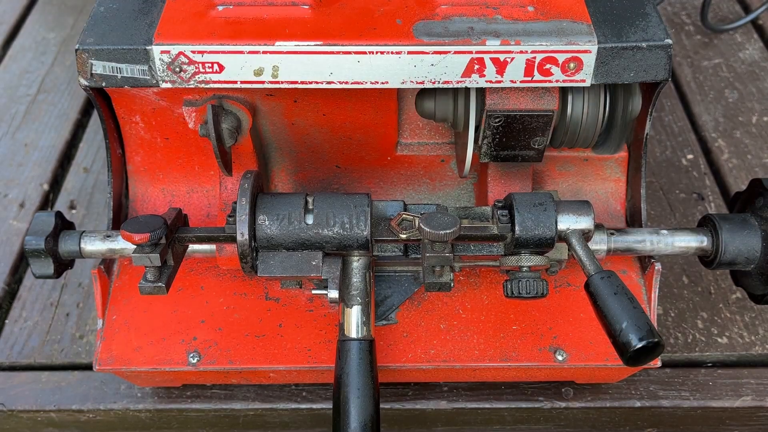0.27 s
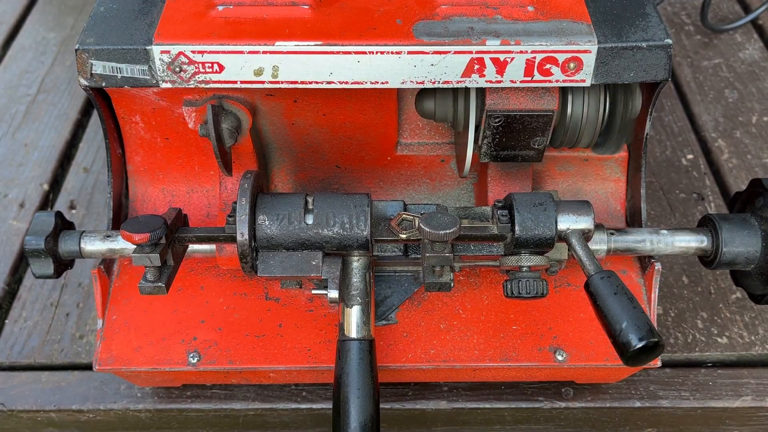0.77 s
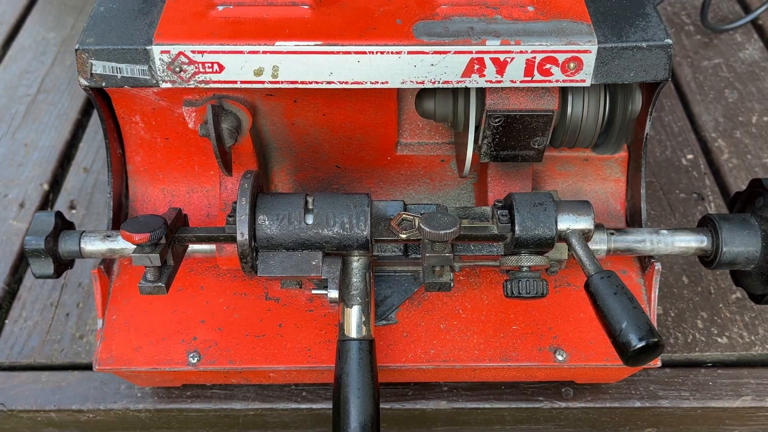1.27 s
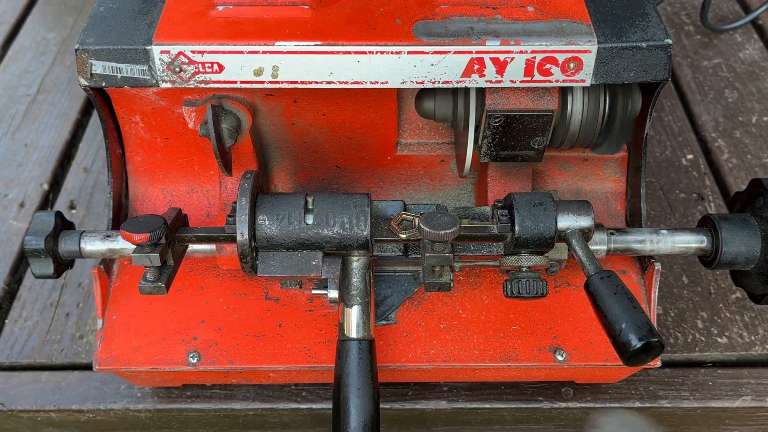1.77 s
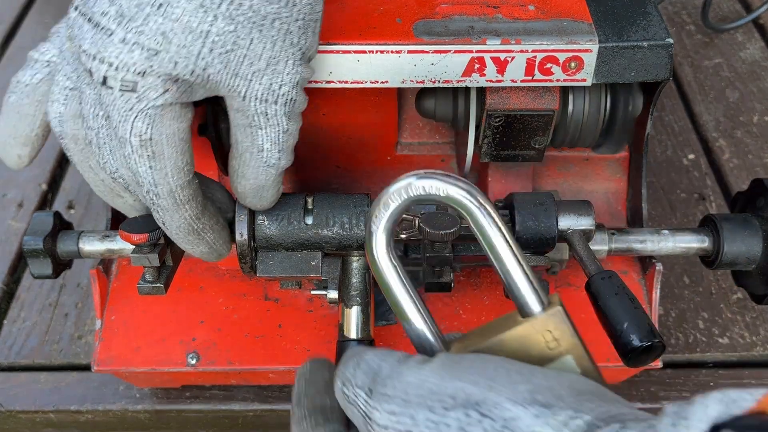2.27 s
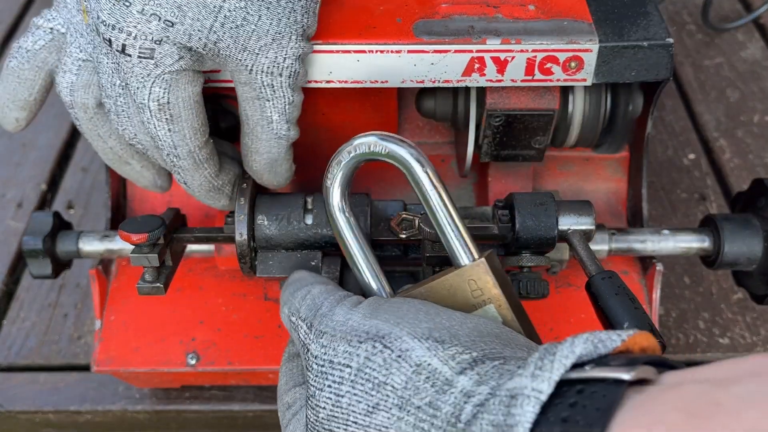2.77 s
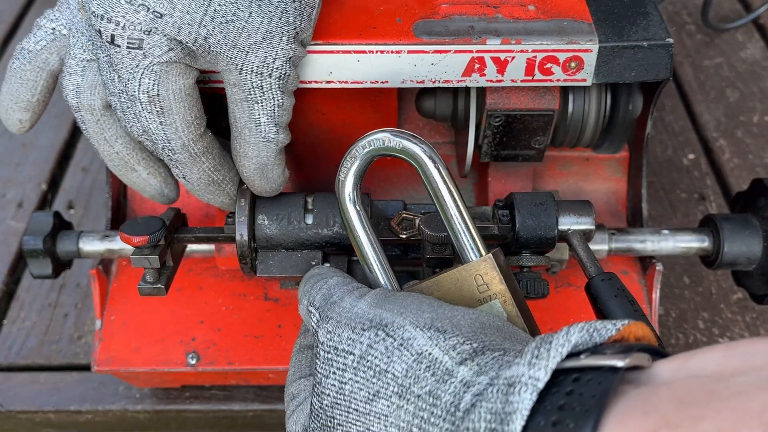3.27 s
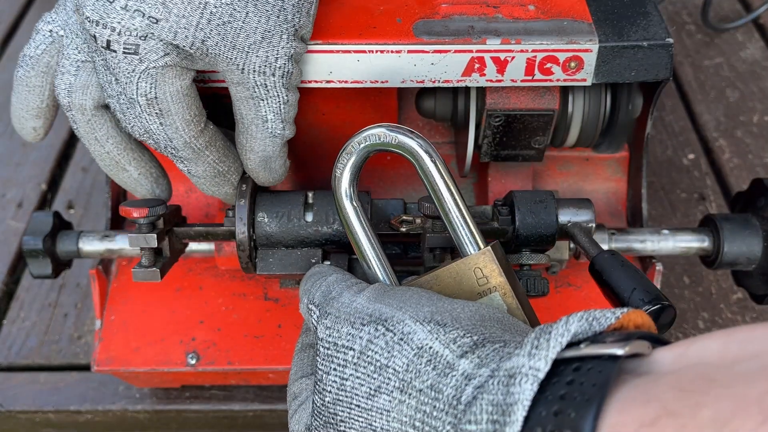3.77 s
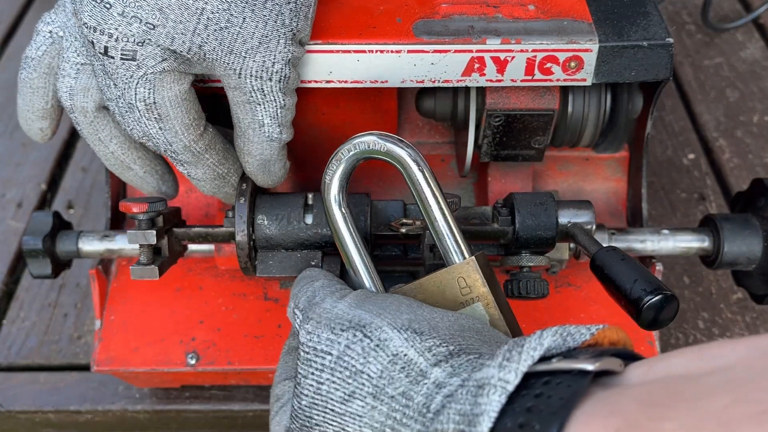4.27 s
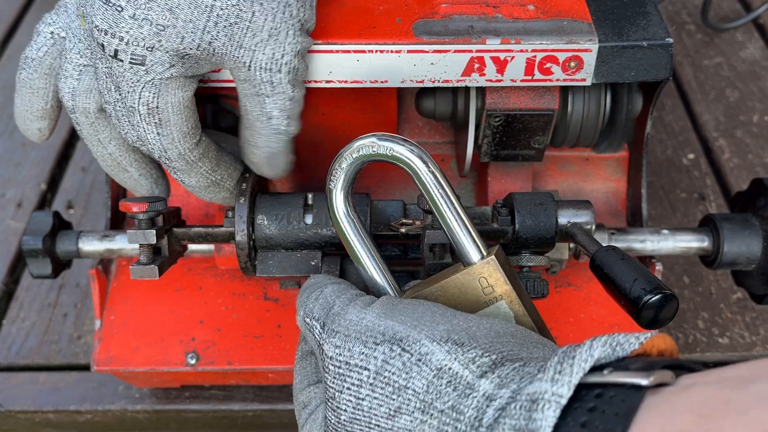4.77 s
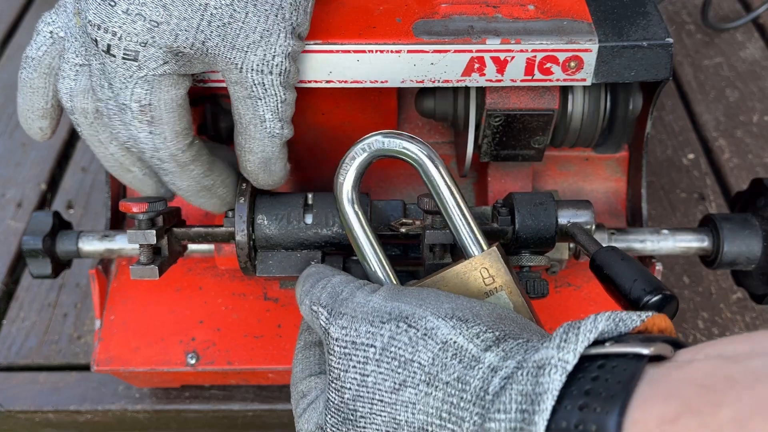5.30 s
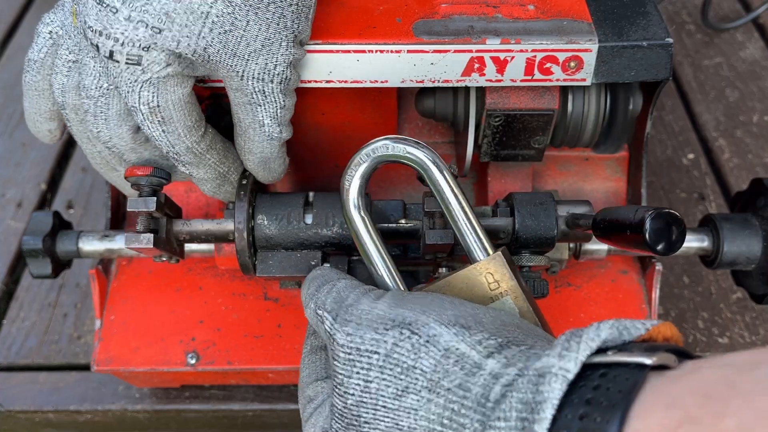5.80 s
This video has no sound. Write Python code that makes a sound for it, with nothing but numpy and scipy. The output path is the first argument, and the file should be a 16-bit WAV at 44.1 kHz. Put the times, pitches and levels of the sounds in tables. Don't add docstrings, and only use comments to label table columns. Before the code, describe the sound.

Steady low motor hum with faint whine and rattling sheet metal, a brief spill of tiny metal parts, sparse ticks, then mostly plain running.

```python
import sys
import numpy as np
from scipy import signal
from scipy.fft import rfft, irfft
from scipy.io import wavfile
from scipy.ndimage import uniform_filter1d

SR = 44100
rng = np.random.default_rng(int(sys.argv[2]) if len(sys.argv) > 2 else 0)


def invert_db(level):
    return 10 ** (np.asarray(level, dtype=float) / 20)


def dump(signal):
    limited = np.clip(np.atleast_2d(signal).T, -1, 1)
    pcm = np.round(limited * 32767).astype(np.int16)
    wavfile.write(sys.argv[1], SR, pcm)


N = 266364
T = np.arange(N) / SR
HZ = np.maximum(np.arange(N // 2 + 1) * SR / N, 1)

HUM_HZ, SHAFT_HZ, BELT_HZ, WHEEL_HZ = 99.78, 24.7895, 5.112, 12.1
HUM_DB, WHINE_DB, SWING_DB, RATTLE_DB, WHIRR_DB, HISS_DB = -30.5, -46.5, -38, -39.5, -52.5, -68.5
SLOT_TOUCH_DB, RUMBLE_DB = -80, -50
WHINE_BACK_DB, SLOT_TOUCH_COVER_DB, SWING_COVER_DB = 4.5, 15, -3.5
RATTLE_COVER_DB, WHIRR_COVER_DB, HISS_COVER_DB = -0.67, -2.5, -6
BELT_SWING_DB, BELT_TIGHT_SHARE = 1, 0.35
BUMP_S, BUMP_DB, BUMP_HZ = 1.63, -48, 32
LUMP_WIDTH = 0.087
JOINT_FIRST_S, JOINT_SCRAPE_DB, JOINT_SCRAPE_SLOPE, JOINT_THUMP_DB = 0.1477, -48, 0.8, -22
PING_CYCLES, PING_BRIGHT_HZ, PING_GRIT = 66, 22000, 1.1
CLICK_BRIGHT_HZ, CLICK_GRIT = 9500, .9
CLATTER_S, CLATTER_LENGTH_S, CLATTER_HZ, CLATTER_T60_S = 1.515, .2, 1850, .011
CLATTER_DB, CLATTER_FADE_DB = -39, -6
SURGE_GRIT, PANEL_LAG_MS, SURGE_LAG_MS = 0.37, 1.75, .7

# time in seconds, cover 0-1, whine thrown back 0-1,
# lean on the bench in dB.
HANDS = [(0.0, 0.1, 0, 1.5), (.33, 0.2, 0.3, 0.5), (.55, 0.45, 0.54, 0.4), (1.3, 0.2, 0, -0.5),
         (2.0, 0.58, 0.2, -.6), (2.95, 0.62, 0.03, -0.2), (3.15, 1, 1, 0.5), (3.8, .95, 0.4, -2),
         (3.95, 0.94, .8, -1), (4.65, 0.92, 0.05, -0.5), (5.0, 0.9, 0.3, -1.5), (5.35, 1, 0.83, 0),
         (6.04, 0.93, 0.2, 0)]
# frequency in Hz, likeness 0-1, left lead in radians, left minus right in dB.
PORTS = [(25, .93, -.2, 0), (100, .9, -.7, .3), (210, .92, -1.05, -2), (320, .98, -.2, 1),
         (400, .99, -.6, -.3), (550, .92, -.1, -3.4), (720, .85, 0, -9.5), (950, .9, 1.8, -4.3),
         (1190, .8, 1.2, 0), (1500, .55, .5, -3), (2050, .9, -.1, .5), (2900, .6, 1.1, 1.8),
         (4300, .6, .3, 0), (5000, .8, -.2, 0), (5600, .5, -1.9, -.5), (6300, .85, -2.8, 0),
         (6900, .92, -3.5, 0), (7500, .8, -4.7, -1.5), (8400, .96, -5.9, -.3), (9900, .96, -6.7, 0),
         (10600, .85, -7.5, 0), (11800, .95, -9, .3), (13600, .95, -9.8, .3), (14200, .8, -10.8, .3),
         (15500, .9, -12.3, .3)]
# frequency in Hz, density in dB per Hz.
RUMBLE = [(12, -86), (20, -45.5), (43, -16.5), (86, -7.5), (121, -10), (150, -6), (190, -45), (250, -52),
          (420, -120)]
# frequency in Hz, density in dB per Hz.
HISS = [(2500, -39), (4000, -4), (5000, -11), (6000, -6.5), (6700, -3.5), (7500, -9.5), (8600, -10.5),
        (10000, -14.5), (11500, -11.5), (12800, -15), (14200, -16), (15700, -24), (15900, -78)]
# frequency in Hz, width in Hz, level in dB.
BEARING_MODES = [(1270, 530, 4.5), (1500, 24, 6), (1800, 190, -6.5), (1963, 310, -2.5), (2057, 45, 5.5),
                 (2200, 510, -6), (2500, 300, -9.5), (2886, 490, -5.5), (3370, 710, -13), (3563, 51, -1),
                 (3810, 260, -6.5)]
# time in seconds, body in dB, bright part in dB.
RUBS = [(.165, -67, -66), (.925, -41, -78), (1.165, -47, -80), (1.275, -52, -60), (1.33, -54, -72),
        (1.512, -38, -60), (1.532, -38, -52.5), (1.59, -63, -66), (1.64, -43, -76), (1.672, -43, -69),
        (1.75, -40, -72), (1.91, -38, -69), (2.102, -43, -75), (2.31, -44, -71), (2.42, -60, -71),
        (2.508, -46, -63), (2.6, -44, -76), (2.725, -44, -81), (2.91, -53, -69), (3.3, -47, -62),
        (3.497, -39, -56.5), (3.889, -57, -74), (4.078, -48, -71), (4.48, -53, -71), (4.672, -68, -69),
        (5.069, -48, -67), (5.258, -59, -69), (5.642, -45, -64)]
# start in seconds, peak in dB, ring in Hz.
PINGS = [(1.5356, -30, 5230), (1.538, -43.5, 1500), (1.541, -30.5, 1800), (1.542, -32.5, 2500),
         (1.552, -35.5, 1950), (1.5746, -29.5, 2280), (1.577, -43, 1800), (1.584, -40, 1404),
         (1.642, -42.5, 1500), (1.652, -35.5, 1880), (1.66, -63, 2780), (1.678, -50, 2200),
         (1.685, -49, 2000), (1.695, -49, 1680), (1.615, -53, 1940), (2.042, -40, 1500),
         (2.187, -39.5, 1820), (2.319, -48, 1920), (3.068, -45, 3370), (3.093, -43, 2570),
         (5.843, -42, 2010)]
# start in seconds, peak in dB, ring in Hz, 60 dB decay time in seconds.
CLICKS = [(0.1545, -34, 3220, 0.0055), (0.154, -50, 4300, 0.005), (0.153, -42, 8900, 0.012),
          (.165, -36, 2850, 0.0041), (.3404, -34.5, 5200, 0.011), (0.3412, -30.5, 1800, 0.0068),
          (0.341, -45, 7900, 0.008), (1.515, -41, 2140, .02), (1.579, -47, 3940, .01),
          (1.6318, -37, 5000, 0.014), (1.6321, -30, 8660, 0.018), (1.945, -30, 2400, 0.0085),
          (2.116, -41, 2760, 0.0051), (2.187, -47, 3000, 0.0051), (1.543, -49, 3200, 0.0059),
          (2.143, -40.5, 7400, 0.023), (2.149, -51, 7950, .03), (2.336, -45, 7100, 0.03),
          (2.435, -52, 4930, .02), (3.299, -42, 2500, 0.013), (3.3013, -51, 7700, 0.02)]
# frequency in Hz, width in Hz, level in dB.
CASE_MODES = [(208.2, 33, -2), (330, 19, -15.5), (361, 62, -9), (415, 34, -5), (460, 30, -8.5),
              (494.7, 45, -7.5), (562.6, 22, -14), (625, 39, -13), (699, 48, -14.5), (735, 72, -16),
              (884, 117, -16.5), (1006, 220, -21)]
JOINT_DB = [-11, 1, -6, -4.5, -0.5, -5, 1.5, -20, 1, -0.5, -2.5, -1, 1.5, -2.5, 0, -14, -22, -3, -33, -7.5,
            -33, -31, -11, -7, -4, -42, -27, -22, -17, -5]
# peak time in seconds, peak in dB, ring in Hz.
BIG_SURGES = [(0.124, -27, 207), (0.175, -35, 205), (0.209, -31.5, 201), (0.352, -22.5, 212),
              (0.407, -31.5, 214), (0.495, -28.5, 208), (0.607, -29.5, 202), (0.754, -30, 198),
              (0.797, -29, 194), (0.887, -23, 195), (0.939, -21, 210), (1.189, -41.5, 197),
              (1.287, -34, 203), (1.34, -27.5, 212), (1.528, -33, 212), (1.576, -30, 201),
              (1.774, -22.5, 210), (1.818, -28, 202), (1.921, -23, 215), (2.056, -28, 207),
              (2.127, -22, 208), (2.264, -31.5, 214), (2.319, -17.5, 200), (2.509, -19.5, 215),
              (2.598, -28, 206), (2.637, -32, 207), (2.738, -31, 199), (2.906, -21, 210),
              (3.098, -27.5, 213), (3.323, -33, 208), (3.401, -24, 203), (3.488, -28, 215),
              (3.581, -29, 211), (3.784, -23, 207), (3.905, -34, 211), (4.094, -31.5, 200),
              (4.197, -28.5, 201), (4.68, -31.5, 227), (4.778, -30.5, 203), (4.889, -32.5, 201),
              (4.994, -33, 213), (5.08, -28.5, 193), (5.174, -27.5, 190), (5.366, -34, 203),
              (5.476, -35.5, 204), (5.575, -30, 201), (5.657, -35, 205), (5.849, -29, 205)]
# peak time in seconds, peak in dB, ring in Hz.
SIDE_SURGES = [(0.287, -39, 395), (0.362, -29.5, 428), (0.468, -36, 398), (0.594, -30.5, 480),
               (0.656, -39.5, 375), (0.694, -27.5, 378), (0.74, -37, 398), (0.771, -32, 455),
               (0.876, -34, 474), (0.948, -29.5, 421), (1.06, -29, 391), (1.277, -31, 373),
               (1.315, -34, 402), (1.349, -28, 416), (1.378, -37.5, 346), (1.451, -32, 385),
               (1.52, -22, 395), (1.628, -33, 400), (1.848, -32, 366), (1.934, -31, 460), (2.09, -35, 415),
               (2.136, -39, 417), (2.321, -28.5, 397), (2.434, -35.5, 387), (2.519, -29.5, 426),
               (2.681, -38, 393), (2.72, -34, 418), (2.792, -33.5, 390), (2.843, -30.5, 368),
               (2.894, -35, 430), (3.002, -39.5, 416), (3.105, -47, 431), (3.181, -28, 415),
               (3.226, -27.5, 383), (3.774, -31, 428), (3.808, -38.5, 395), (3.894, -28, 436),
               (3.995, -33, 374), (4.089, -34, 492), (4.164, -38.5, 387), (4.29, -29, 395),
               (4.324, -33, 383), (4.365, -40, 390), (4.485, -32, 477), (4.585, -30.5, 475),
               (4.684, -40.5, 382), (4.912, -35, 384), (4.947, -37.5, 383), (5.274, -34.5, 368),
               (5.337, -32.5, 500), (5.369, -30.5, 395), (5.417, -31, 384), (5.538, -32.5, 382),
               (5.661, -30, 395), (5.739, -37, 390), (5.948, -33, 390)]
# peak time in seconds, peak in dB, ring in Hz.
COVER_SURGES = [(0.075, -46, 665), (0.115, -41, 667), (0.212, -34.5, 705), (0.487, -34.5, 690),
                (0.685, -40, 640), (0.766, -40, 670), (0.936, -34, 740), (0.97, -35, 862),
                (1.133, -37.5, 735), (1.172, -33, 735), (1.237, -38, 651), (1.329, -29.5, 722),
                (1.535, -30, 860), (1.57, -36, 730), (1.647, -38, 670), (1.762, -33, 732),
                (1.922, -32, 672), (2.13, -32.5, 643), (2.254, -31.5, 666), (2.327, -33, 634),
                (2.422, -32.5, 640), (2.462, -36, 660), (2.515, -28.5, 660), (2.618, -41, 710),
                (2.695, -36.5, 665), (2.745, -32, 736), (2.779, -37.5, 654), (2.813, -33, 674),
                (2.915, -41, 742), (2.945, -42, 730), (2.98, -36.5, 697), (3.093, -37.5, 720),
                (3.21, -37, 696), (3.327, -36, 680), (3.401, -32, 707), (3.511, -36.5, 713),
                (3.606, -41, 637), (3.664, -39, 657), (3.92, -32, 690), (4.001, -35, 700),
                (4.175, -34.5, 670), (4.38, -31, 670), (4.482, -37, 605), (4.556, -35, 660),
                (4.673, -32, 623), (4.754, -39, 649), (4.84, -35, 659), (4.878, -32.5, 637),
                (4.965, -38, 643), (5.037, -34, 660), (5.069, -45, 650), (5.166, -30, 640),
                (5.392, -40, 660), (5.475, -50, 664), (5.658, -32, 598), (5.708, -34.5, 675),
                (5.768, -34, 674), (5.8, -37, 656), (5.851, -29, 730), (5.967, -37, 660)]
SURGE_RISE_CYCLES = (4.3, 4.9, 5.3)
SURGE_FALL_CYCLES = (5.6, 7.9, 9.3)
# frequency in Hz, width in Hz, level in dB.
KNOCKED_MODES = [(312, 25, -9), (399.3, 10.6, -7)]
# share of the turn 0-1, swing 0-1, lag in ms.
LUMPS = [
    (0.079, 0.87, 0.92),
    (.3, 1, -.5),
    (.54, 0.7, 0.88),
    (.8, 0.72, 3),
    (0.936, 0.84, 1.5),
]
# shaft order, hum order (their multiples add up), level in dB.
TONES = [(0, 3, -54), (22, -1, -56), (22, 0, -63), (22, 1, -49), (23, 1, -54), (22, 2, -57), (22, 4, -64),
         (44, -1, -67), (44, 0, -65), (45, 0, -73), (49, 0, -60), (44, 2, -64), (45, 2, -71), (44, 3, -68),
         (42, 1, -63), (43, 10, -71), (110, 0, -84), (110, 1, -76), (110, 2, -76), (110, 3, -82)]


def unit(x):
    return x / np.sqrt(np.mean(x ** 2))


def on_hz(table, column):
    rows = np.array(table)
    return np.interp(np.log(HZ), np.log(rows[:, 0]), rows[:, column])


def resonance(hz, width, db):
    return invert_db(db) / (1 + 1j * (HZ / hz - hz / HZ) * hz / width)


def resonances(table):
    return np.sqrt(sum(abs(resonance(*mode)) ** 4 / invert_db(mode[2]) ** 2 for mode in table))


def walk(rate):
    hold = int(SR / rate)
    levels = np.repeat(rng.standard_normal(N // hold + 1), hold)
    return unit(uniform_filter1d(uniform_filter1d(levels, hold), hold)[:N])


def ports(x, slant=1):
    half = (invert_db(on_hz(PORTS, 3) / 2) * np.exp(.5j * on_hz(PORTS, 2))) ** slant
    x = x * np.minimum(np.minimum(T, T[::-1]) / .0006, 1)
    return irfft(rfft(x) * np.array([half, 1 / half]), N)


def spread_noise(envelope, response):
    alike = np.clip(on_hz(PORTS, 1), 0, 1)
    shared, left, right = (rfft(envelope * rng.standard_normal(N)) for _ in range(3))
    pair = np.sqrt(alike) * shared + np.sqrt(1 - alike) * np.array([left, right])
    return ports(irfft(pair * response / np.sqrt(np.mean(abs(response) ** 2)), N))


def belt_db():
    return BELT_SWING_DB * np.cos(4 * np.pi * (T * BELT_HZ - BELT_TIGHT_SHARE))


def joint_passes(level_db, slope):
    return [(JOINT_FIRST_S + k / BELT_HZ, level_db + slope * db) for k, db in enumerate(JOINT_DB)]


def swells(events, length_s):
    out, shape = np.zeros(N), np.hanning(int(length_s * SR))
    for s, db in events:
        start = int((s - .012) * SR)
        out[start:start + len(shape)] += invert_db(db) * shape
    return out


def bench():
    bump = invert_db(BUMP_DB) * np.exp(-((T - BUMP_S) / 0.12) ** 2) * np.sin(2 * np.pi * BUMP_HZ * T)
    rumble = spread_noise(invert_db(RUMBLE_DB + 0.51 * walk(4.77)), invert_db(on_hz(RUMBLE, 1)))
    return rumble + bump


def bearings(whirr_db, hiss_db):
    whirr = invert_db(whirr_db + 0.5 + 0.5 * belt_db() + 0.58 * walk(16))
    whirr = whirr + invert_db(-14.5) * swells(joint_passes(JOINT_SCRAPE_DB, JOINT_SCRAPE_SLOPE), 0.082)
    whirr = whirr + invert_db(-12.0) * swells([(s, body_db) for s, body_db, _ in RUBS], 0.052)
    hiss = invert_db(hiss_db + 4.5 + 0.062 * belt_db() + .7 * walk(20))
    hiss = hiss + invert_db(-0.5) * swells([(s, bright_db) for s, _, bright_db in RUBS], 0.047)
    frame = resonances(BEARING_MODES) / (1 + (900 / HZ) ** 4) / (1 + (HZ / 4300) ** 4)
    return spread_noise(whirr, frame) + spread_noise(hiss, invert_db(on_hz(HISS, 1)))


def clatter(count=90):
    late, size, pitch = rng.random((count, 3)).T
    start = CLATTER_S + CLATTER_LENGTH_S * late ** 1.1
    level = CLATTER_DB + CLATTER_FADE_DB * late - 8 * size
    ring_hz = CLATTER_HZ * 2 ** (1.2 * (pitch - .5))
    return [(s, db, hz, CLATTER_T60_S, .1, PING_GRIT) for s, db, hz in zip(start, level, ring_hz)]


def ticks():
    out, t = np.zeros(N), T[:4096]
    hz_axis = np.maximum(np.arange(2049) * SR / 4096, 1)
    # s, dB, Hz, t60 s, bright share, grit
    touches = [(s, db, hz, PING_CYCLES / hz, hz / PING_BRIGHT_HZ, PING_GRIT) for s, db, hz in PINGS]
    touches += [(s, db, hz, t60, (hz / CLICK_BRIGHT_HZ) ** 2, CLICK_GRIT) for s, db, hz, t60 in CLICKS]
    for s, db, hz, t60, bright, grit in touches + clatter():
        fall = np.exp(-np.log(1000) * t / t60)
        spray = rfft(fall * rng.standard_normal(len(t)))
        bright = np.clip(bright, 0, 1)
        ping = fall * np.sin(2 * np.pi * hz * t) * np.minimum(t / 0.0007, 1)
        snap = np.exp(-t / 0.0003) * np.sin(2 * np.pi * max(hz, 3000) * t)
        rattle = irfft(spray / (1 + 3j * (hz_axis / hz - hz / hz_axis)) ** 2)
        ring = ping + .8 * min(hz / 2500, 1) ** 3 * snap + grit * rattle
        crack = irfft(spray * 1.72 / (1 - 1j * 4000 / hz_axis) ** 2)
        start = int(s * SR)
        out[start:start + len(t)] += invert_db(db) * ((1 - bright) * ring + bright * crack)
    out = irfft(rfft(out) / (1 + 1j * (HZ / 8800) ** 2) / (1 + (HZ / 15700) ** 40), N)
    return ports(out) + .45 * ports(np.roll(out, 30), slant=0)


def case(rattle_db):
    pulse = 1 + 0.12 * np.sin(2 * np.pi * HUM_HZ * T)
    steady = invert_db(rattle_db + 2.06 + 1.23 * belt_db() + 0.94 * walk(14)) * pulse
    thump_envelope = invert_db(-15) * swells(joint_passes(JOINT_THUMP_DB, 1), .085)
    thump = spread_noise(thump_envelope, resonances(CASE_MODES[6:]))
    return spread_noise(steady, resonances(CASE_MODES)) + thump


def surges():
    out, t = np.zeros(N + 8192), T[:8192] - T[3072]
    tables = (BIG_SURGES, SIDE_SURGES, COVER_SURGES)
    for table, rise, fall, trim_db in zip(tables, SURGE_RISE_CYCLES, SURGE_FALL_CYCLES, (-5.0, -3.0, -2.5)):
        for (s, db, hz), turn in zip(table, rng.random(len(table))):
            if table is BIG_SURGES:
                turn = 2 * HUM_HZ * (s - PANEL_LAG_MS / 1000 - SURGE_LAG_MS / 1000)
            shape = np.exp(-(t * hz / np.where(t < 0, rise, fall)) ** 2)
            start = int(s * SR)
            out[start:start + len(t)] += invert_db(db + trim_db) * shape * np.sin(2 * np.pi * (hz * t + turn))
    return ports(out[3072:N + 3072] * (1 + SURGE_GRIT * walk(110)))


def panels(knock_db):
    at = (np.arange(int(T[-1] * HUM_HZ)) * SR / HUM_HZ).astype(int)
    strain = invert_db(1.3 * belt_db()) * (1 + 0.13 * np.sin(2 * np.pi * WHEEL_HZ * T + 0.28))
    strain = strain / strain.mean() - .55
    knocks = np.zeros(N)
    knocks[at] = strain[at] + 0.7 * rng.standard_normal(len(at))
    steep = sum(resonance(*mode) ** 2 / invert_db(mode[2]) for mode in KNOCKED_MODES)
    return ports(invert_db(knock_db + 2.0) * unit(irfft(rfft(knocks) * steep, N)))


def big_panel(swing_db):
    turn = T * BELT_HZ % 1
    cycle_ms = 1000 / (2 * HUM_HZ)
    loaded = np.zeros(N, complex)
    for share, swing, lag_ms in LUMPS:
        distance = (turn - share + .5) % 1 - .5
        loaded += swing * np.exp(-(distance / LUMP_WIDTH) ** 2 - 2j * np.pi * lag_ms / cycle_ms)
    throb = 1 + 0.28 * np.sin(2 * np.pi * WHEEL_HZ * T + 0.69)
    loaded = loaded.mean() + (loaded - loaded.mean()) * throb
    carrier = np.exp(4j * np.pi * HUM_HZ * (T - PANEL_LAG_MS / 1000))
    return ports(invert_db(swing_db - 0.3) * unit(np.imag(loaded * carrier)))


def magnets(hum_db, whine_db, touch_db):
    out = invert_db(hum_db) * np.sin(2 * np.pi * HUM_HZ * T)
    slip = 0.18 * walk(.7)
    whine_phase = 2 * np.pi * (44 * SHAFT_HZ + HUM_HZ) * T + slip
    out = out + invert_db(whine_db + 1.2 * walk(12)) * np.sin(whine_phase)
    touch_phase = 2 * np.pi * 71 * SHAFT_HZ * T + 3 * slip
    out = out + invert_db(touch_db + 3.0 * walk(9)) * np.sin(touch_phase)
    for turns, pulls, db in TONES:
        phase = 2 * np.pi * ((turns * SHAFT_HZ + pulls * HUM_HZ) * T + rng.random()) + 0.23 * walk(1.55)
        out = out + invert_db(db + 2.0 * walk(2.82)) * np.sin(phase)
    return ports(np.sqrt(2) * out)


def scene():
    s, *columns = np.transpose(HANDS)
    cover, back, lean_db = (np.interp(T, s, column) for column in columns)
    rattle_db = RATTLE_DB + RATTLE_COVER_DB * cover
    mix = bench() + ticks() + surges() + case(rattle_db) + panels(rattle_db - 6.0)
    mix = mix + bearings(WHIRR_DB + WHIRR_COVER_DB * cover, HISS_DB + HISS_COVER_DB * cover)
    mix = mix + big_panel(SWING_DB + SWING_COVER_DB * cover ** 3)
    whine_db = WHINE_DB + WHINE_BACK_DB * back
    return mix + magnets(HUM_DB + lean_db, whine_db, SLOT_TOUCH_DB + SLOT_TOUCH_COVER_DB * cover)


def band_limit(x):
    return signal.sosfilt(signal.butter(12, 15850, fs=SR, output="sos"), x)


def record(dry):
    return band_limit(dry)


dry = scene()
out = record(dry)
dump(out)
```